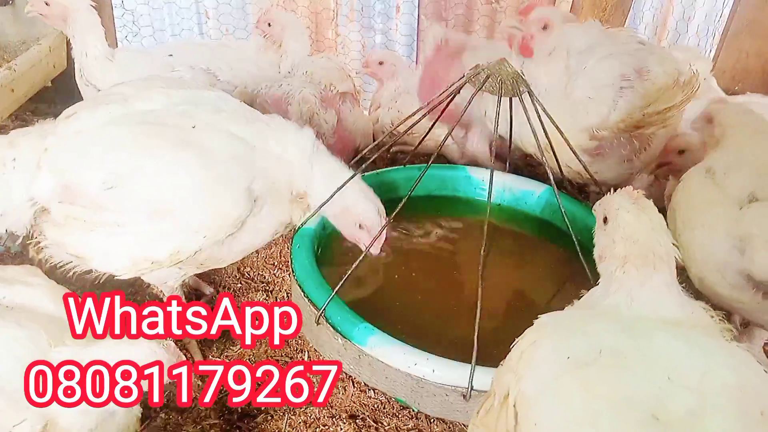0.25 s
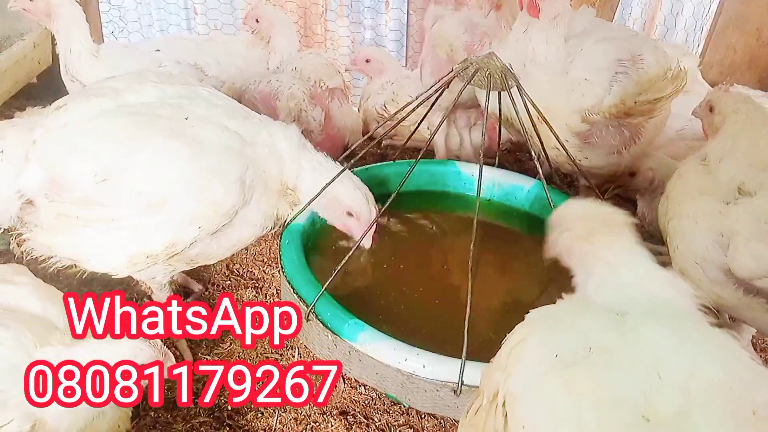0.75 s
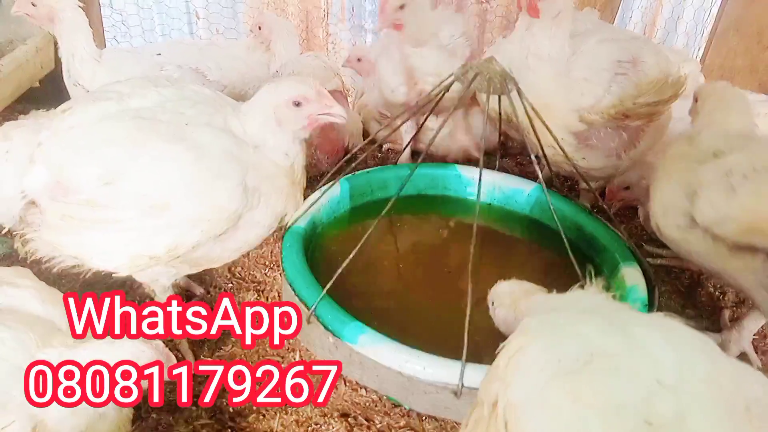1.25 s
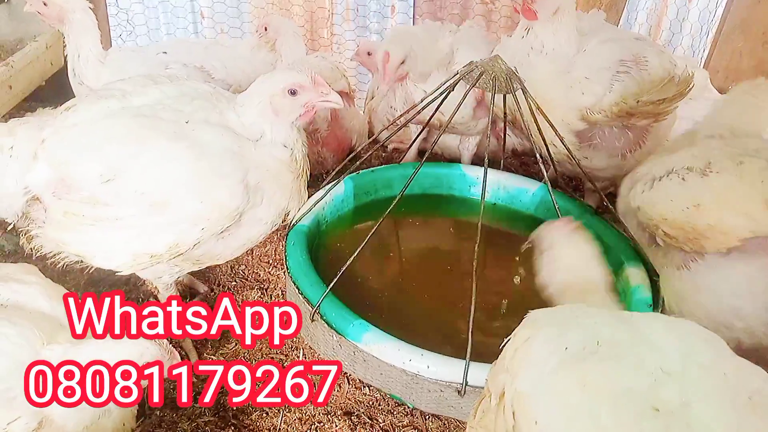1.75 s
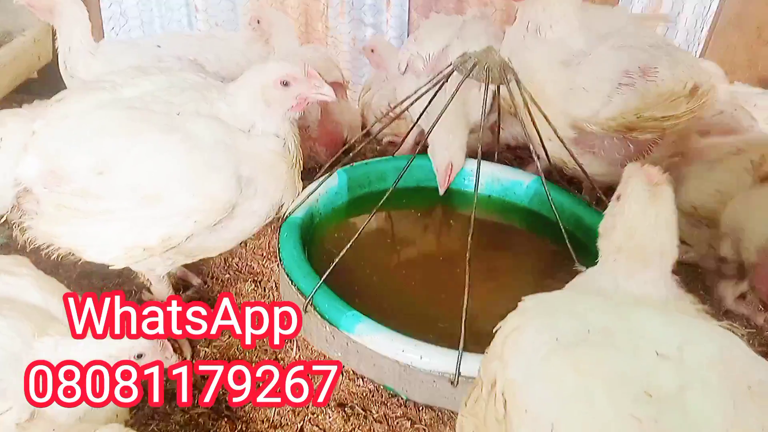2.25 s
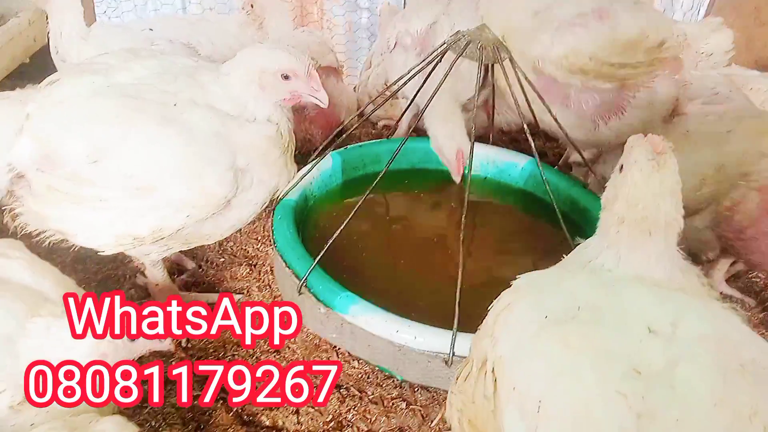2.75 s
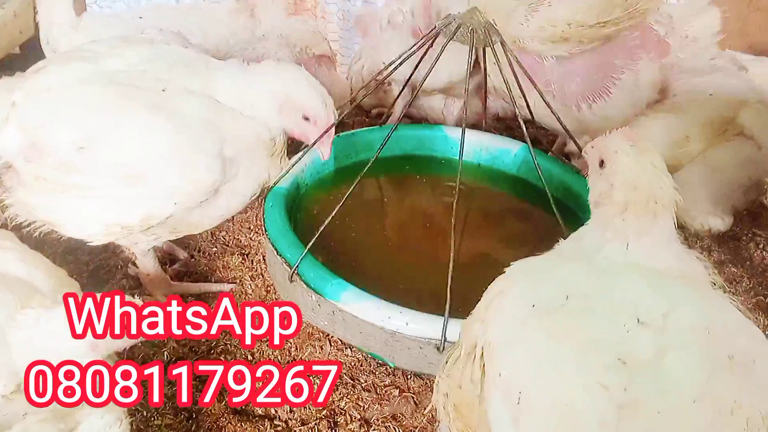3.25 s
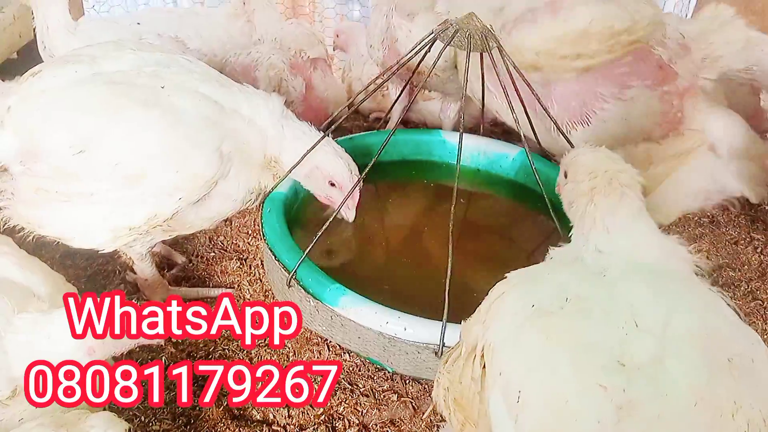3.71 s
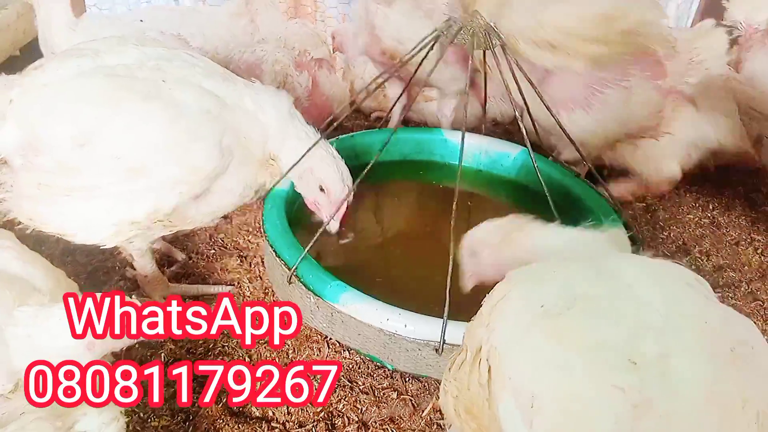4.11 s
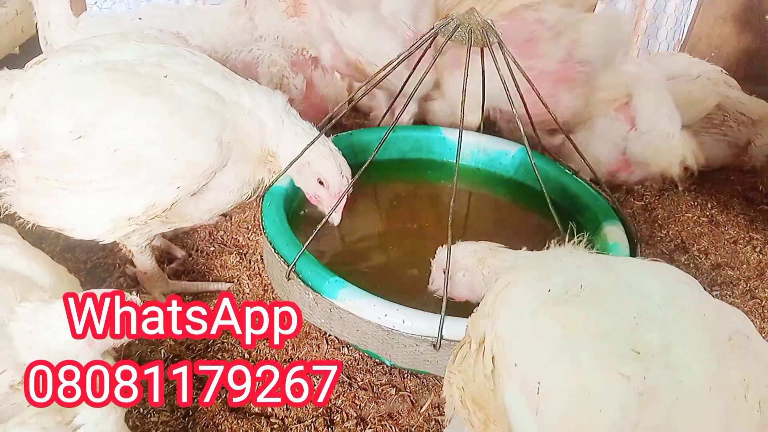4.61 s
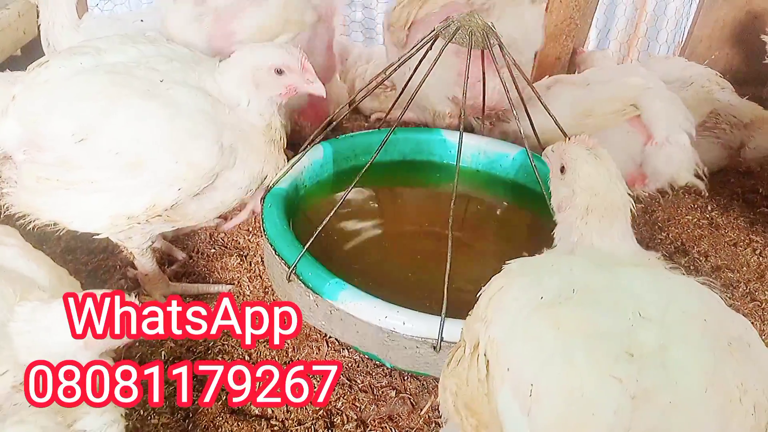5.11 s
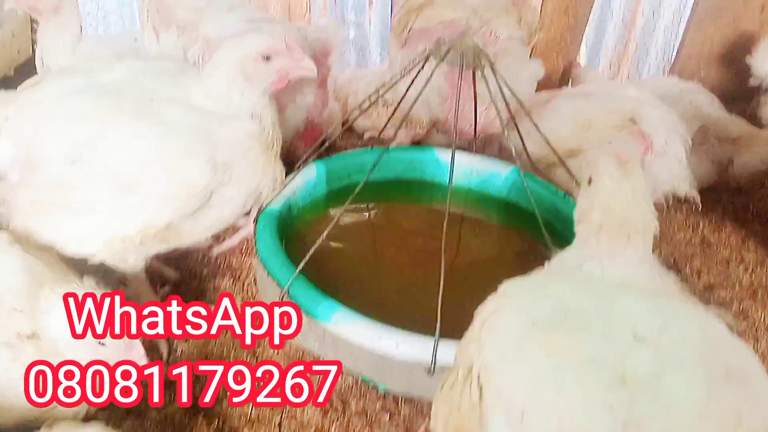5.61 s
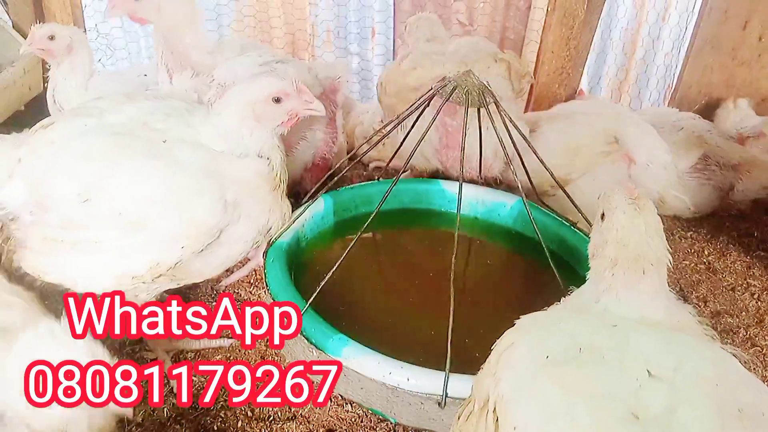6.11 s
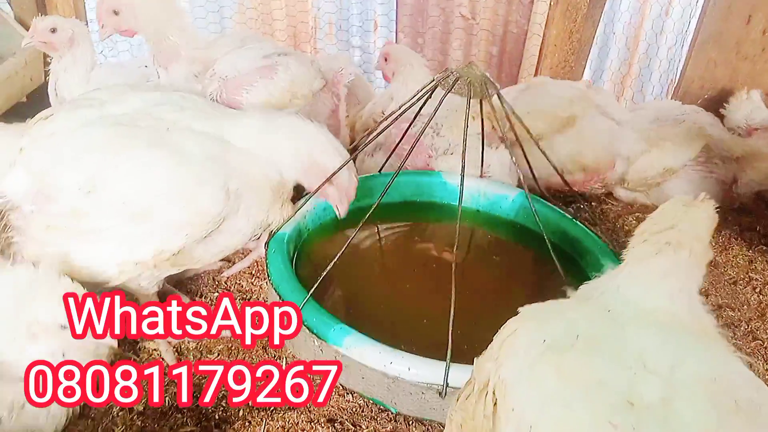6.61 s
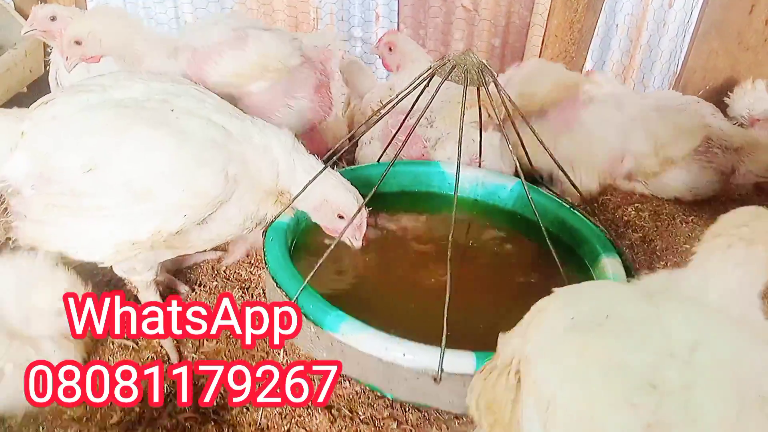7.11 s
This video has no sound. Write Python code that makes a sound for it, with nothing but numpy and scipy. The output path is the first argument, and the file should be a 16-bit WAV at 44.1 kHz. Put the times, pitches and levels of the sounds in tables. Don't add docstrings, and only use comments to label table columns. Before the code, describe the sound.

Chickens around a water pan are heard closely by a phone in a small pen with very short reflections. A faint flock chatter, litter rustle and low trampling continue throughout, briefly dipping under noise control. At first there are soft peeps and ticks, a scuffle and airy puff near 0.7 s, then clucks and a squawk around 1 s. Sparse ticks and puffs follow; a clear hooked peep comes at 2.4 s and another falling peep at 2.5 s. Quick clucks cluster at 3.5 s, with more peeps and hoarse clucks from 3.9 to 4.7 s. Footfalls and pan knocks thicken near 4.8 s. The sharpest click and bright sneeze-like burst land with a squawk at 5.4 s. A peep follows at 5.85 s, a loud throaty cluck with ticks and scuffle at 6.35 s, a round coo at 6.8 s, then small clucks and rustling to the end.

```python
import sys
import numpy as np
from scipy import signal
from scipy.fft import rfft, irfft
from scipy.io import wavfile
from scipy.ndimage import uniform_filter1d, map_coordinates

SR = 44100
rng = np.random.default_rng(int(sys.argv[2]) if len(sys.argv) > 2 else 0)


def ratio_of_db(decibels):
    return 10 ** (np.asarray(decibels, float) / 20)


def transcribe(signal):
    frames = np.atleast_2d(signal).T
    limited = np.clip(frames, -1, 1)
    pcm = np.round(limited * 32767).astype(np.int16)
    wavfile.write(sys.argv[1], SR, pcm)


N = 324576
T = np.arange(N) / SR


def unit(x):
    return x / np.sqrt(np.mean(x ** 2) + 1e-20)


def along(points, hz):
    f, v = np.transpose(points)
    return np.interp(np.log(hz + 1), np.log(f + 1), v)


def wobble(rate_hz, size=N):
    knots = rng.standard_normal(max(int(size * rate_hz / SR) + 4, 160))
    return map_coordinates(knots, [np.arange(size) * rate_hz / SR])


def noise(gain, patchy_db):
    hz, _, z = signal.stft(rng.standard_normal(N), SR, nperseg=512)
    field = rng.standard_normal(z.shape)
    field = uniform_filter1d(uniform_filter1d(field, 4, 0), 6, 1)
    z = z * gain(hz)[:, None] * ratio_of_db(patchy_db * unit(field))
    return unit(signal.istft(z, nperseg=512)[1][:N])


def zone(spectrum, lo_hz, hi_hz, steep):
    def gain(f):
        edges = (1 + (lo_hz / (f + 1)) ** steep) * (1 + (f / hi_hz) ** steep)
        return ratio_of_db(along(spectrum, f)) / np.sqrt(edges)
    return gain


def lift(hz, centre_hz, width_hz):
    return 1 / (1 + ((hz - centre_hz) / width_hz) ** 2)


def call(start_s, length_s, rise):
    at = int(start_s * SR)
    u = np.arange(0, 1, 1 / (length_s * SR))[:N - at]
    return at, u, np.sin(np.pi * u ** rise) ** 1.1


# t/s, length/s
DIPS = [(0.116, 0.082), (0.212, 0.069), (0.329, 0.083), (0.64, 0.032), (0.951, 0.048), (1.478, 0.087),
        (2.08, 0.08), (4.34, 0.13), (1.286, 0.085), (4.767, 0.032), (5.175, 0.023), (5.276, 0.03),
        (5.947, 0.13), (6.437, 0.011), (6.582, 0.028), (6.938, 0.074), (7.114, 0.092), (7.245, 0.022)]
DIP_DB = -4.5


def noise_control():
    shut_db = sum(DIP_DB * ((T > s) & (T < s + length_s)) for s, length_s in DIPS)
    return ratio_of_db(uniform_filter1d(shut_db, size=600))


# t/s, bustle/dB
BUSTLE = [(0.0, -3.5), (0.47, -7.5), (0.72, -5), (1.35, -8), (1.74, -5.5), (3.01, -4), (3.22, -2),
          (3.57, -0.5), (4.06, 5), (4.41, -2), (4.86, 2), (5.45, 8), (5.76, 3.5), (5.9, 1.5), (6.13, -1.5),
          (6.35, 7), (6.79, 4.5), (7.36, 8)]
# low f/Hz, high f/Hz, level/dB, growth/(dB per dB of bustle)
BANDS = [
    (261, 450, -73.5, 1.3),
    (840, 3400, -66.5, 0.84),
    (3830, 7230, -66.5, 0.79),
    (10000, 6900, -75.5, 1.5),
]
# f/Hz, level/dB
PEN = [(120, -46), (200, 23.5), (305, -16), (491, 2.5), (647, -19.5), (1650, -17.5), (2170, -24),
       (6050, -7)]
# f/Hz, level/dB
LITTER = [(2170, -37), (6050, -4), (10700, -17), (13600, -7), (14900, 13), (16000, 11)]
# t/s, level/dB
TRAMPLE = [(0.0, -62), (0.41, -60), (0.92, -63.5), (1.27, -58.5), (4.12, -60), (5.62, -57.5), (6.41, -56.5),
           (6.91, -55), (7.36, -55)]
# f/Hz, level/dB
GROUND = [(15, -27), (25, -20.5), (59, 1.5), (91, -1), (153, -4.5), (260, -25), (340, -44.5), (570, -120)]


def background():
    bustle_db = np.interp(T, *np.transpose(BUSTLE))
    breath_db = 2.0 * wobble(22) + 1.6 * wobble(90)
    flock = 0
    for (lo_hz, hi_hz, db, grows), colour in zip(BANDS, (PEN, PEN, LITTER, LITTER)):
        level_db = db + grows * bustle_db + breath_db + 1.1 * wobble(30)
        flock = flock + ratio_of_db(level_db) * noise(zone(colour, lo_hz, hi_hz, steep=9), patchy_db=2.8)
    step_db = np.interp(T, *np.transpose(TRAMPLE))
    white = rfft(rng.standard_normal(N))
    ground = unit(irfft(white * ratio_of_db(along(GROUND, np.fft.rfftfreq(N, 1 / SR))), N))
    return noise_control() * flock + ratio_of_db(step_db) * ground


def far_flock():
    out = np.zeros(N)
    for when, pitch, life, size in rng.uniform(size=(420, 4)):
        at, u, swell = call(when * (T[-1] - .1), 0.015 + 0.0723 * life, rise=0.67)
        hz = 800 * 3.6 ** pitch * (1 - .1 * pitch * u)
        note = np.sin(2 * np.pi * np.cumsum(hz) / SR)
        out[at:][:len(u)] += ratio_of_db(10 * size) * swell * wobble(200, size=len(u)) * note
    return ratio_of_db(np.interp(T, *np.transpose(BUSTLE)) - 72.5) * unit(out)


# t/s, length/s, throat f/Hz, level/dB, pitch f/Hz
CLUCKS = [(3.177, 0.056, 1190, -49.5, 586), (4.188, .04, 1700, -49, 570), (4.217, .042, 900, -49.5, 476),
          (1.025, 0.057, 890, -44, 470), (4.85, .045, 810, -59, 450), (0.29, 0.073, 430, -68, 420),
          (0.295, .07, 1000, -69, 500), (1.625, 0.078, 1150, -66.5, 520), (6.398, .016, 900, -47, 450),
          (5.845, 0.052, 1600, -56.5, 530), (3.496, 0.023, 2100, -45.5, 498.6),
          (3.524, 0.027, 850, -38, 446), (3.548, 0.02, 894, -42, 440), (3.915, 0.022, 1100, -51.5, 460),
          (4.994, 0.078, 730, -57, 711), (5.893, 0.022, 1080, -52, 500), (6.634, 0.029, 1020, -58.5, 510),
          (2.5, 0.018, 1100, -56, 597), (7.318, 0.026, 1000, -44, 500), (7.339, 0.022, 960, -45, 475),
          (7.314, 0.042, 2000, -56, 510)]
RASPS = [(1.219, 0.22, 300, -61.5, 129.6), (3.509, 0.029, 1830, -42.5, 507),
         (4.27, 0.057, 1600, -47.5, 330.6), (5.124, 0.057, 970, -60, 560), (6.966, 0.051, 1900, -54.5, 442),
         (3.755, 0.12, 400, -59, 160), (4.122, .07, 390, -59.5, 140), (4.2, 0.12, 480, -60.5, 160),
         (4.485, 0.096, 570, -67, 180), (4.685, .055, 640, -57, 200), (3.228, 0.049, 1470, -58, 510),
         (3.43, 0.024, 2300, -56.5, 560), (0.02, 0.075, 850, -61.5, 300), (2.69, .06, 1030, -63.5, 280),
         (4.19, .13, 1300, -54, 300), (2.33, .07, 550, -61, 180), (6.345, .07, 1300, -42, 240),
         (3.96, .1, 700, -62, 230)]
SQUAWKS = [
    (1.015, 0.059, 1470, -44, 488.6),
    (5.412, 0.052, 1730, -35, 402.4),
    (7.2, 0.039, 1530, -51, 489),
]
COOS = [
    (6.815, 0.074, 1180, -37, 722),
]
BAWKS = [
    (6.336, 0.067, 1200, -32, 300),
    (1.002, 0.063, 1750, -40.5, 496),
    (6.817, .05, 2100, -49, 722),
    (6.81, .05, 1090, -49, 361),
]
KINDS = [
    (.33, .14, .96),
    (.65, .27, .92),
    (.62, .33, .65),
    (.12, .45, .65),
    (.3, .22, .93),
]


def clucks():
    out = np.zeros(N)
    tables = (CLUCKS, RASPS, SQUAWKS, COOS, BAWKS)
    rows = [(*row, *kind) for table, kind in zip(tables, KINDS) for row in table]
    for s, length_s, open_hz, db, hz, rough, wide, shut in rows:
        shut_hz, width_hz = shut * open_hz, wide * open_hz
        at, u, swell = call(s, length_s, rise=0.72)
        throat_hz = shut_hz + (open_hz - shut_hz) / (1 + np.exp((u - .3) / 0.15))
        sag = 1 - 0.1 * rough * (u - .4)
        jitter = 1 + 0.054 * rough * wobble(80.4, size=len(u))
        half_turn = np.pi * np.cumsum(hz * sag * jitter) / SR
        voice = power = 0
        knots = rng.standard_normal((40, 50))
        for k in range(2, min(int(11000 / hz), 40)):
            line_hz = k * hz * sag / 2
            throat_gain = 1 / (1 + ((line_hz - throat_hz) / width_hz) ** 2) ** 1.46
            rasp_gain = 0.05 * rough * (line_hz > throat_hz)
            gain = (throat_gain + rasp_gain) * (0.75 * rough if k % 2 else 1)
            shake = unit(1 - rough + rough * map_coordinates(knots[k], [u * length_s * 189]))
            voice = voice + gain * shake * np.sin(k * half_turn + 9 * knots[k, -1])
            power = power + gain ** 2 / 2
        out[at:][:len(u)] += ratio_of_db(db) * swell ** 2.04 * voice / np.sqrt(power)
    return out


# t/s, length/s, first f/Hz, level/dB, overtone/dB
PEEPS = [(0.922, 0.032, 2960, -48, -10), (2.546, .068, 3100, -42, -12), (3.876, .07, 3600, -41, -14),
         (0.049, 0.056, 3550, -52, -8.5), (1.661, 0.048, 2730, -46.5, -41), (1.802, 0.039, 3000, -50, -22),
         (2.193, 0.09, 3026, -55.5, -10), (3.253, 0.089, 3550, -56, -9), (3.721, 0.068, 3260, -48.5, -2),
         (4.462, 0.079, 3590, -56.5, -10), (4.549, 0.11, 3890, -49, -7.5), (4.585, .05, 3480, -49, -22),
         (4.687, 0.06, 3600, -40.5, -5), (5.088, 0.063, 2800, -55, -0.5), (5.296, 0.065, 3460, -46, -16),
         (5.375, 0.037, 2780, -54, -30), (5.846, 0.056, 3450, -41, -17), (6.242, 0.092, 3692, -52, -4),
         (6.977, 0.026, 3700, -50, -35)]
# t/s, length/s, aimed f/Hz, last f/Hz, level/dB
HOOKED = [
    (2.372, 0.063, 3360, 2087, -40),
    (2.978, 0.11, 3665, 1687, -51),
    (6.082, .098, 3515, 1800, -45),
]
# t/s, length/s, first f/Hz, last f/Hz, level/dB
WAVERS = [(0.852, 0.08, 2980, 3040, -54.5), (0.879, 0.076, 3460, 3150, -50.5),
          (0.981, 0.079, 2936, 2840, -53.5), (1.47, 0.05, 1900, 1703, -46.5),
          (1.592, 0.054, 2840, 2400, -59), (1.98, 0.063, 3050, 2560, -61.5),
          (4.299, 0.036, 3020, 2950, -47), (4.335, 0.053, 2882, 1975, -53), (1.63, .05, 2340, 1950, -58),
          (6.97, 0.021, 1715, 1640, -49.5), (6.974, 0.029, 2194, 1810, -49), (6.998, .02, 2790, 2580, -53),
          (3.225, .06, 2450, 2160, -61), (2.514, .042, 2850, 3150, -52), (3.857, .024, 2350, 3700, -51),
          (4.351, 0.065, 2940, 2200, -59.5)]
# f/Hz, width/Hz, level/dB
BEAK = [
    (5050, 1100, 0),
    (7150, 550, -2),
]
FALL_PER_S, HOOK_DEPTH, HOOK_S = 5.7, .42, .009
FALL_HOARSE, WAVER_HOARSE, WAVER_OVERTONE_DB, HOOK_OVERTONE_DB = .45, .48, -26, -13
WINDPIPE_HZ, WINDPIPE_WIDTH_HZ = 2690, 950


def peeps():
    out = np.zeros(N)
    rows = [(s, length_s, hz, hz * (1 - FALL_PER_S * length_s), db, over_db, FALL_HOARSE, 0)
            for s, length_s, hz, db, over_db in PEEPS]
    rows += [(*row, HOOK_OVERTONE_DB, FALL_HOARSE, HOOK_DEPTH) for row in HOOKED]
    rows += [(*row, WAVER_OVERTONE_DB, WAVER_HOARSE, 0) for row in WAVERS]
    for s, length_s, start_hz, end_hz, db, over_db, hoarse, hook in rows:
        at, u, swell = call(s - .006, length_s + .012, rise=.85)
        slide = (u * (length_s + 0.01195) - .006) / length_s
        slide = slide + 0.14 * np.sin(np.pi * u) * (hook == 0)
        hz = start_hz + (end_hz - start_hz) * slide
        hz = hz * (1 + 0.0278 * hoarse * wobble(154.7, size=len(u)))
        below = hook * np.exp(-np.maximum(slide, 0) * length_s / HOOK_S)
        hz = hz * (1 - below)
        swell = swell * (1 - 2 * below)
        turn = 2 * np.pi * np.cumsum(hz) / SR
        upper = 0
        for k, (centre_hz, width_hz, up_db) in enumerate(BEAK, start=2):
            upper = upper + ratio_of_db(over_db + up_db) * lift(k * hz, centre_hz, width_hz) ** 2 * np.sin(k * turn)
        beat = unit(wobble(300, size=len(u)) + hoarse * wobble(650, size=len(u)))
        beat = 1 - hoarse + hoarse * beat
        breath = ratio_of_db(1.8 * wobble(90, size=len(u)) - 4 * u)
        whistle = unit(beat) * np.sin(turn) * unit(lift(hz, WINDPIPE_HZ, WINDPIPE_WIDTH_HZ))
        overtones = ratio_of_db(3) * unit(.6 + beat) * upper
        out[at:][:len(u)] += ratio_of_db(db) * swell * breath * (whistle + overtones)
    return out


# t/s, peak level/dB, length/s, low band/dB
SCUFFLES = [(0.158, -52.5, 0.035, -22), (0.191, -55, 0.059, 0), (0.276, -62, 0.034, 8),
            (0.4504, -45.5, 0.027, 0), (0.698, -35, 0.045, -6.5), (0.781, -52.5, 0.056, 4.5),
            (0.833, -51, 0.083, -2), (1.003, -49.5, 0.055, 10.5), (1.107, -50, 0.059, -4.5),
            (1.209, -47.5, 0.068, -8), (1.753, -42, 0.02, 0.5), (2.176, -47.5, 0.038, 7),
            (2.372, -42, 0.05, 0.5), (3.875, -40, 0.052, -21), (4.564, -44, 0.09, -10),
            (5.307, -35, 0.059, -30), (5.697, -41, 0.057, -3), (6.073, -45.5, 0.062, -2.5),
            (6.36, -29.5, 0.037, -7)]
# t/s, peak level/dB, length/s, top band/dB
SNEEZES = [(0.749, -32, 0.038, -16.5), (1.873, -44.5, 0.079, -7), (1.9155, -39.5, 0.043, 8.5),
           (2.544, -38, 0.054, -14), (2.979, -39, 0.075, -12), (3.167, -41, 0.072, -11),
           (3.428, -47, 0.052, -8), (4.122, -44.5, 0.094, -7), (4.693, -36.5, 0.045, -11),
           (5.014, -35, 0.069, -12), (5.195, -41, 0.094, -6), (5.409, -23, 0.035, -10),
           (5.43, -23.5, 0.032, -23), (5.577, -39, 0.062, -6), (5.77, -41, 0.15, -8),
           (6.517, -37, 0.045, -3), (6.964, -40.5, .049, -13), (7.016, -39.5, 0.058, -8),
           (7.21, -44, 0.033, -13), (7.265, -40.5, 0.081, -7)]
# f/Hz, level/dB
PUFF = [(150, -44), (250, -18), (971, -5.5), (1980, -2.5), (2490, -13), (5160, -12), (12800, -25),
        (15200, -12)]
SCUFFLE_TOP_DB, SNEEZE_LOW_DB = -68, -9.5


def bursts():
    edges_hz = [(500, 2600), (2200, 8000), (8500, 17000)]
    low, mid, top = [noise(zone(PUFF, lo, hi, steep=22.4), patchy_db=3.5) for lo, hi in edges_hz]
    grit = ratio_of_db(1.25 * wobble(500))
    out = np.zeros(N)
    rows = [(*row, SCUFFLE_TOP_DB - row[1]) for row in SCUFFLES]
    rows += [(s, db, length_s, SNEEZE_LOW_DB, top_db) for s, db, length_s, top_db in SNEEZES]
    for s, db, length_s, low_db, top_db in rows:
        u = np.clip((T - s + 0.0053) / max(length_s, .01), 0, 3)
        on = slice(*np.flatnonzero((u > 0) & (u < 3))[[0, -1]])
        swell = 3.1 * u[on] * np.exp(-2.6 * u[on] ** 1.63)
        puff = ratio_of_db(low_db + 3.0) * low[on] + mid[on] + ratio_of_db(top_db) * top[on]
        out[on] += ratio_of_db(db - 11.5) * swell * grit[on] * puff
    return out


# t/s, peak level/dB, ring f/Hz
THUDS = [(0.444, -45, 91), (1.21, -42, 128), (1.279, -45, 96), (1.874, -48, 81), (2.385, -45, 115.6),
         (2.437, -45, 96), (2.589, -38.5, 99.6), (3.749, -45.5, 97.6), (3.869, -40, 99), (3.965, -45, 90),
         (4.185, -39.5, 102.5), (4.324, -47.5, 81), (4.71, -44, 88), (4.806, -36.5, 103.5),
         (4.932, -45, 84), (5.168, -44, 105), (5.332, -43, 96.6), (5.53, -41.5, 81), (5.57, -40, 88),
         (5.707, -39, 87), (5.88, -46, 107), (6.387, -47, 94.5), (6.417, -45, 77.4), (6.567, -42, 76.8),
         (6.605, -39, 105.3), (6.747, -39, 85), (6.788, -36, 85), (6.917, -38, 86), (7.101, -40, 91.5)]
LIGHT_STEPS = [0.175, 0.294, 0.524, 0.595, 0.956, 2.977, 3.316, 6.162, 7.048, 7.287]
LIGHT_DB, LIGHT_HZ = -54, 88


def thuds():
    out, t = np.zeros(N + SR), np.arange(SR // 6) / SR
    for s, db, hz in THUDS + [(s, LIGHT_DB, LIGHT_HZ) for s in LIGHT_STEPS]:
        swell = ratio_of_db(-60 * t / 0.15) * (1 - np.exp(-t / 0.0029))
        out[round(s * SR):][:len(t)] += ratio_of_db(db + 5.5) * np.sin(2 * np.pi * hz * t) * swell
    return out[:N]


# t/s, peak level/dB, ring f/Hz, edge/dB
KNOCKS = [(0.187, -53, 237, -18), (0.299, -66, 430, 6), (0.445, -52.5, 183, -19), (0.525, -58, 210.8, -22),
          (1.213, -46.5, 181, -9), (1.76, -52, 550, -1.5), (2.393, -43, 200, -1), (2.442, -55.5, 485, -9),
          (2.695, -63, 427, 7), (2.98, -52, 163, -2.5), (4.8066, -45, 230, 5), (5.248, -66, 589.4, 13),
          (5.413, -46.5, 365, 3), (5.667, -52.5, 448.7, 4), (6.334, -55, 516, 6), (6.714, -54, 483, -13),
          (6.807, -39, 222.4, -4), (7.111, -48.5, 179, -1), (7.287, -48, 180.6, 3)]


def knocks():
    out, t = np.zeros(N + SR), np.arange(SR // 10) / SR
    for s, db, hz, edge_db in KNOCKS:
        ring = np.sin(2 * np.pi * hz * t) * ratio_of_db(-60 * t / 0.065) * (1 - np.exp(-t / 0.0008))
        edge = np.sin(2 * np.pi * 800 * t) * ratio_of_db(-60 * t / 0.005)
        dull = uniform_filter1d(uniform_filter1d(rng.standard_normal(len(t)), size=20), size=9)
        rattle = 1.38 * dull * ratio_of_db(-60 * t / 0.11)
        out[round((s + .003) * SR):][:len(t)] += ratio_of_db(db + 7.0) * (ring + ratio_of_db(edge_db) * (edge + rattle))
    return out[:N]


# t/s, peak level/dB, ring f/Hz, cycles to peak
TICKS = [(1.372, -38, 1810, 1.8), (1.717, -40.5, 1660, 0.9), (1.7579, -49, 1745, 3.8),
         (2.1775, -47, 1344, 3.9), (0.5102, -44, 3200, 1.06), (0.7103, -36, 3020, 2.1),
         (0.7442, -44.5, 1710, 3), (2.4448, -41, 1380, 0.59), (2.9846, -43.5, 2960, 0.63),
         (3.6227, -37.5, 1780, 0.72), (6.1752, -36, 3800, 1.06), (0.5392, -51, 7140, 5.9),
         (0.5921, -48, 4240, 0.82), (0.6873, -50, 3800, 4), (1.4471, -49, 7050, 1.2),
         (2.3052, -45.5, 7360, 2.6), (1.915, -38.5, 6580, 7.2), (6.3076, -30.5, 6100, 1.15),
         (6.3759, -36.5, 7200, 1.3), (6.8558, -39, 6297, 0.78),
         (0.5826, -57, 8000, 1.5), (1.0181, -56, 7800, 1.5), (2.0398, -62, 8500, 1),
          (2.164, -54, 6900, 2.2), (2.219, -54, 8000, 1.4), (3.3109, -52, 8500, 1.1),
          (3.8035, -46, 8700, 2), (6.4577, -47, 7500, 1.2), (2.694, -54, 6300, 1.2),
          (2.798, -49.5, 4500, 0.95), (2.5591, -44, 8500, 1.5), (3.8621, -51, 7200, 4),
          (3.8711, -46, 7200, 4), (5.0255, -50, 8000, 0.91), (5.4135, -28.5, 4500, .7),
          (5.4209, -24, 5100, 1.8), (5.4207, -36, 11000, 2), (5.4305, -26, 5300, 3.1),
          (1.754, -50, 3100, 6.6), (4.8094, -33, 910, 0.69), (7.072, -52, 14800, 3), (6.452, -47, 1150, 3)]


def ticks():
    out, t = np.zeros(N + SR), np.arange(SR // 20) / SR
    for s, db, hz, cycles in TICKS:
        cycles = max(cycles, .5)
        age = t * hz / cycles
        ring = np.sin(2 * np.pi * hz * t) * age * np.exp(1 - age)
        hiss = uniform_filter1d(rng.standard_normal(len(t)), size=3)
        crack = 0.3 / cycles ** 2 * hiss * ratio_of_db(-60 * t / 0.035)
        soft = signal.butter(2, min(2.6 * hz, 15000), fs=SR, output="sos")
        out[round(s * SR):][:len(t)] += ratio_of_db(db) * signal.sosfilt(soft, ring + crack)
    return out[:N]


# t/s, level/dB
ECHOES = [
    (.008, -15),
    (.019, -14),
]


def echoes(x):
    return sum(ratio_of_db(db) * np.roll(x, int(s * SR)) for s, db in ECHOES)


# f/Hz, t60/s
WALLS = [(300, .09), (2500, .07), (9000, .04)]


def walls(x):
    hz, t, z = signal.stft(rng.standard_normal(SR // 3), SR, nperseg=256)
    tail = signal.istft(z * ratio_of_db(-60 * t / along(WALLS, hz)[:, None]), SR, nperseg=256)[1]
    return signal.fftconvolve(np.pad(x, (250, 0)), tail / np.linalg.norm(tail))[:N]


def scene():
    whistles = peeps()
    whistles = whistles + echoes(whistles) + far_flock()
    dulling = signal.butter(4, 8200, fs=SR, output="sos")
    voices = signal.sosfilt(dulling, clucks()) + ticks()
    answer = walls(ratio_of_db(-10.5) * whistles + ratio_of_db(-16) * voices)
    mix = whistles + voices + answer + bursts() + thuds() + knocks() + background()
    return mix[None]


def low_pass(x):
    return signal.sosfilt(signal.butter(12, 16650, fs=SR, output="sos"), x)


def record(dry):
    top_hz = 15680
    kept = irfft(rfft(dry) * (np.fft.rfftfreq(N, 1 / SR) < top_hz), N)
    return low_pass(kept)


dry = scene()
out = record(dry)
transcribe(out)
```